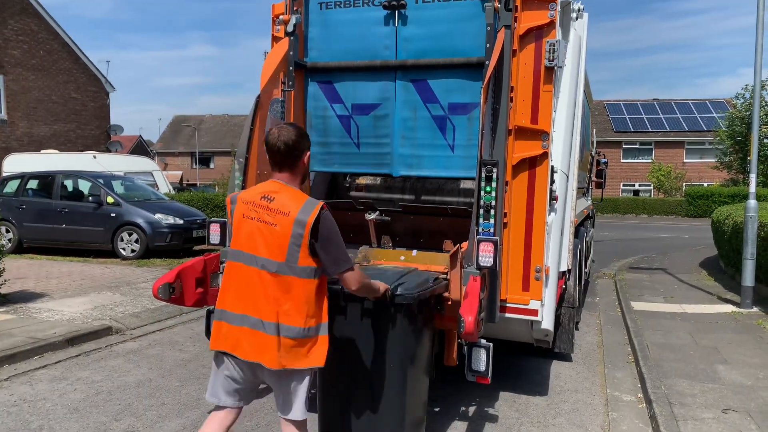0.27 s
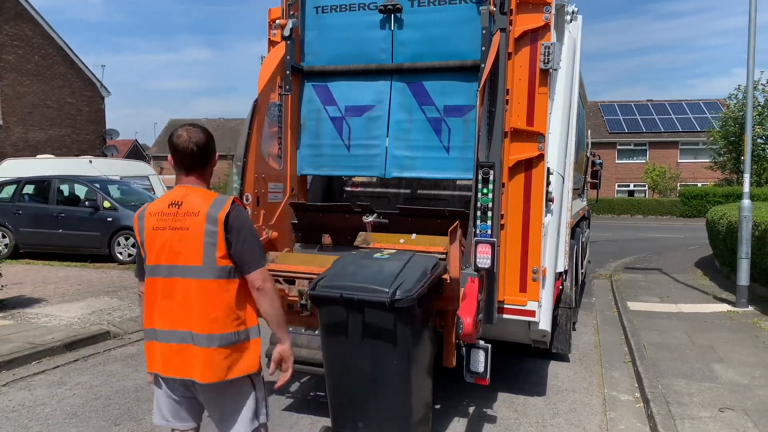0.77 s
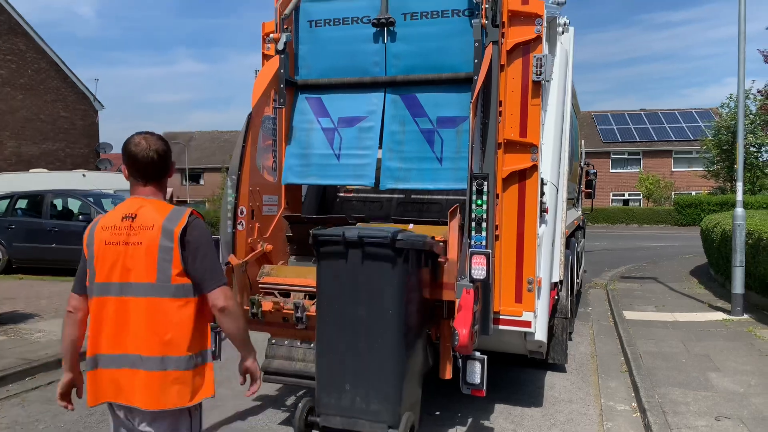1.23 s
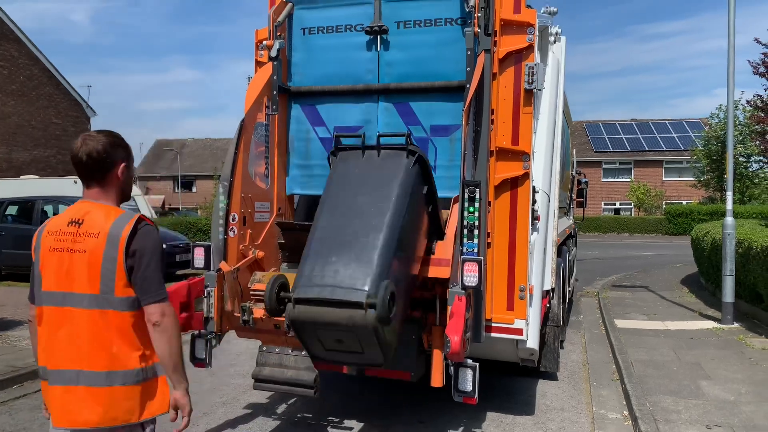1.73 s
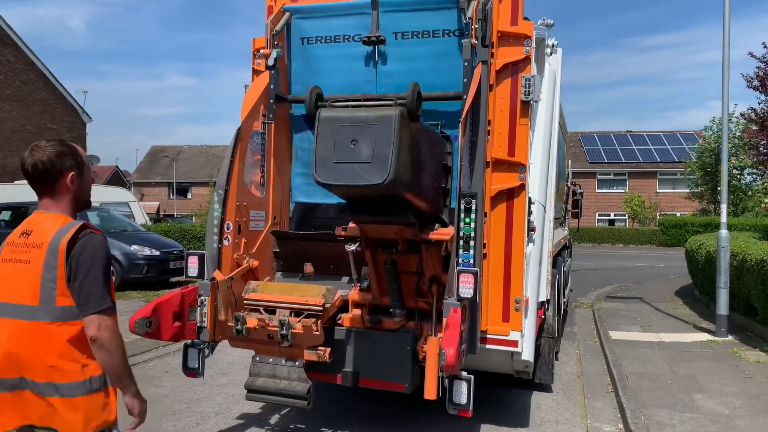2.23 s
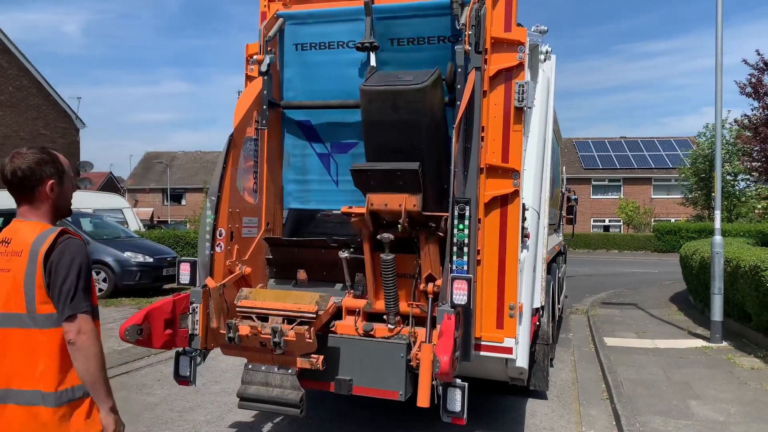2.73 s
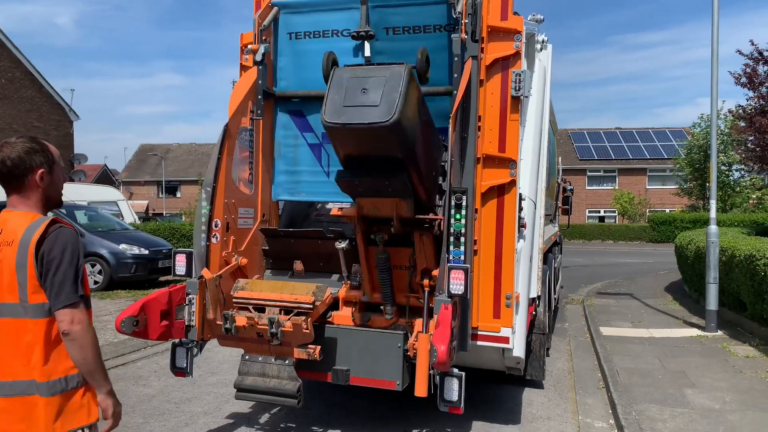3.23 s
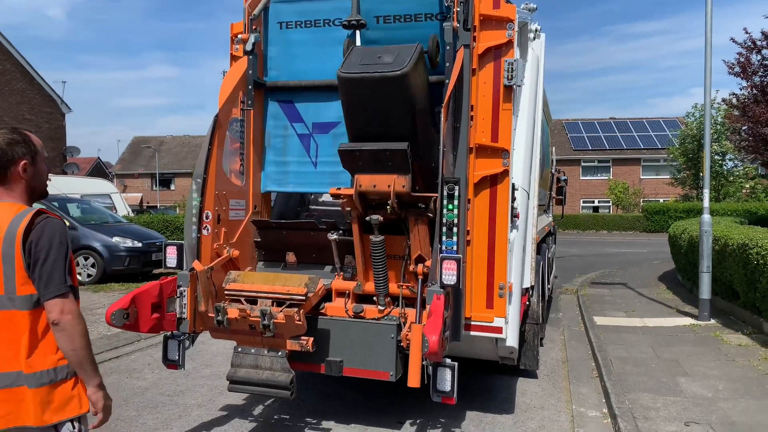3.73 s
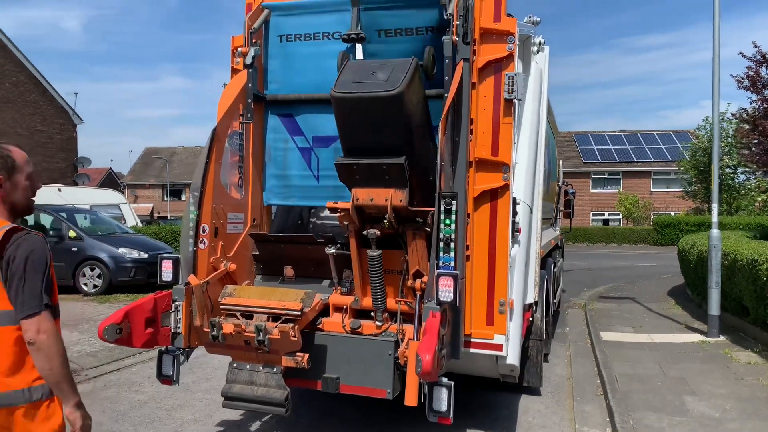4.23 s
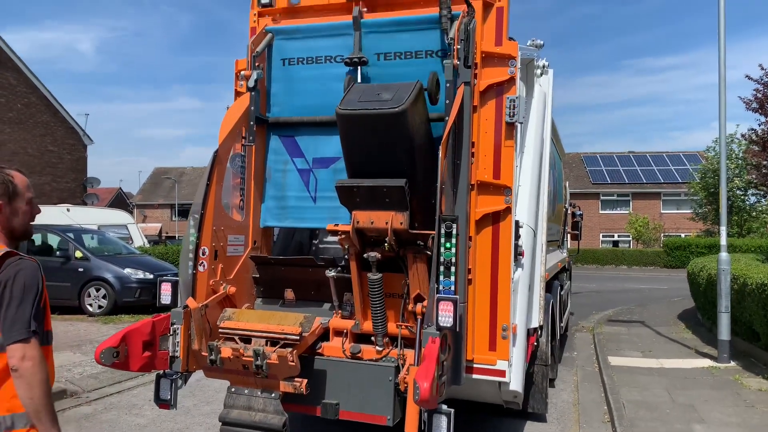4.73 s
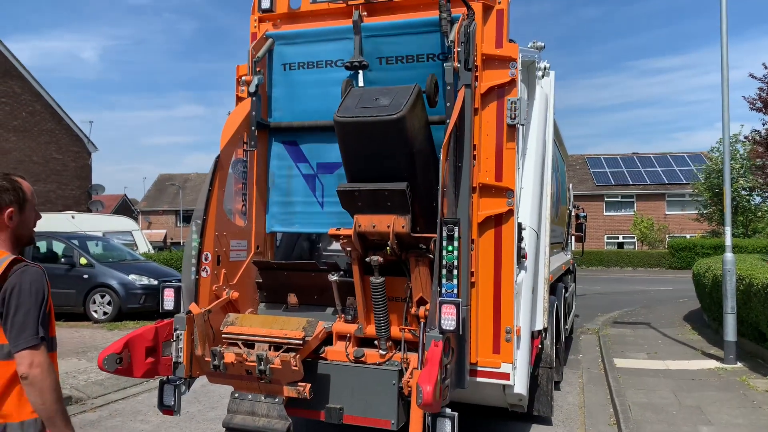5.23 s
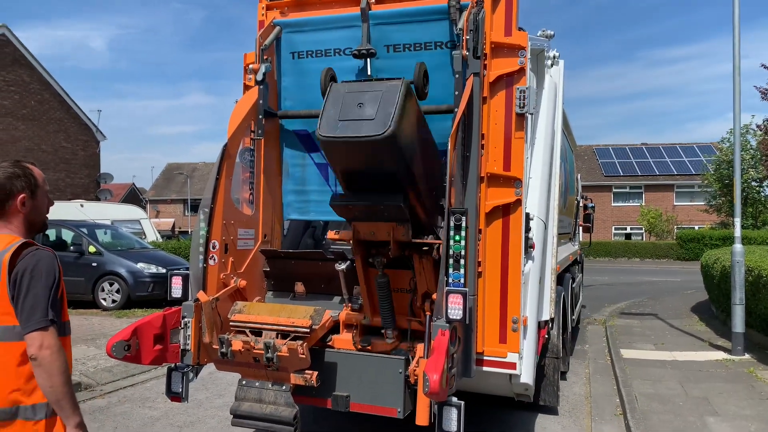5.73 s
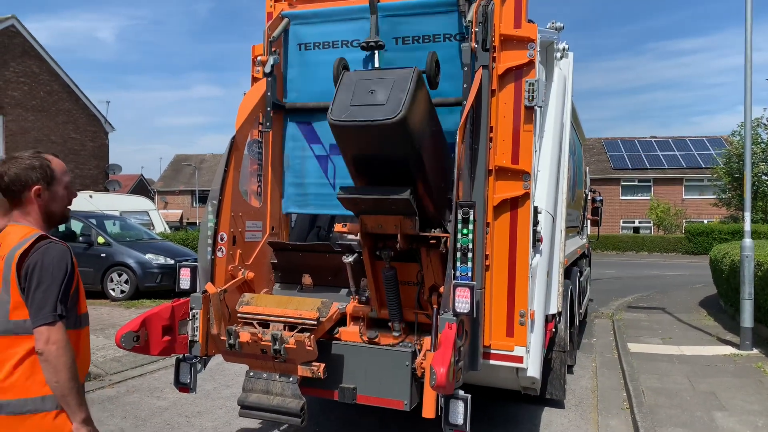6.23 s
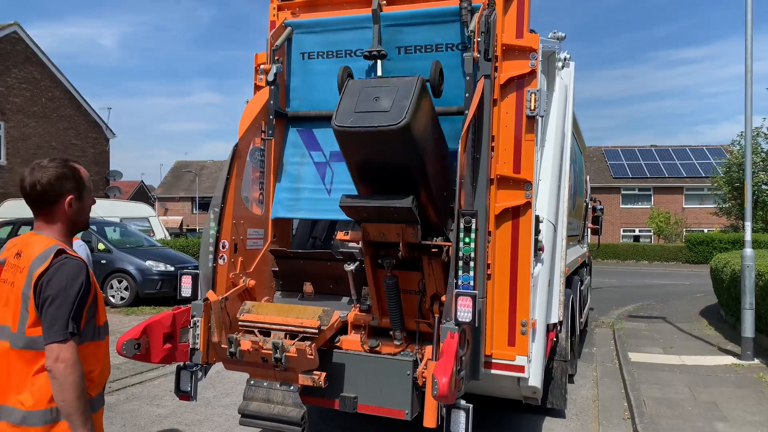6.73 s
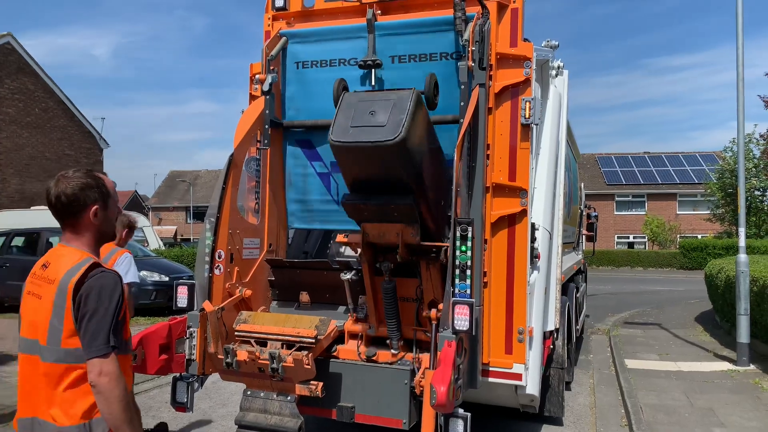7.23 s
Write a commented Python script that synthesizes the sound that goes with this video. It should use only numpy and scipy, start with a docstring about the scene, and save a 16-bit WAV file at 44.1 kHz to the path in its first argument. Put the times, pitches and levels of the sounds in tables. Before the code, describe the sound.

A refuse truck's hydraulic lift hisses as it bangs and shakes a plastic wheelie bin, recycling clattering over a diesel drone and wind.

```python
"""A street of houses: a refuse truck's rear lift hoists a wheelie bin, shakes the recycling into the
hopper and starts to bring it down. The plastic bin bangs on the steel frame, its contents clatter, the
arm groans and squeaks. Oil hisses and whistles through the lift valve; the diesel and its pump drone.
Gusts buffet the microphone, and the house fronts return a faint tail of the lift's noise."""
import sys
import numpy as np
from scipy import signal
from scipy.fft import rfft, irfft, next_fast_len
from scipy.io import wavfile
from scipy.ndimage import map_coordinates

SR = 44100
rng = np.random.default_rng(int(sys.argv[2]) if len(sys.argv) > 2 else 0)


def to_wav(s):
    """Save 16-bit WAV."""
    ch = np.atleast_2d(s).T  # columns
    pcm = np.round(np.clip(ch, -1, 1) * 32767)  # PCM
    wavfile.write(sys.argv[1], SR, pcm.astype(np.int16))


N = 330309

# bin against lift: start_s, level_db, boom_relative_db, boom_hz, rise_s
BLOWS = [(0.193, -12.5, -11, 400, .002), (0.263, -11.5, 8, 292, 0.00054), (0.322, -20, 14.5, 272, 0.0025),
         (0.446, -21, 12, 328, 0.0051), (0.634, -18, 4.5, 303, 0.0071), (0.763, -20, 12.5, 260, .0005),
         (1.352, -19.5, 7, 221, 0.0052), (1.393, -16.5, 1, 382, 0.0023), (1.438, -13, 10.5, 195, 0.0017),
         (1.465, -18, 8, 215, 0.0022), (2.373, -28, -8, 298, 0.0024), (2.628, -15, 10, 250, 0.013),
         (2.735, -24, 17.5, 218.7, 0.0044), (2.848, -8, -10, 398, 0.0055), (2.882, -15.5, 10, 249, 0.0077),
         (3.154, -9, 11, 274, 0.00056), (3.192, -6.5, -8, 329.5, 0.0054), (3.321, -10.5, 0, 449, .005),
         (3.355, -3.5, 2, 330, 0.0019), (3.386, -11.5, 13, 285, 0.0021), (3.412, -18, 18, 270, .004),
         (3.494, -10.5, -6, 452, 0.0028), (4.165, -17, 6, 330, 0.012), (5.576, -21, -5, 400, 0.0057),
         (5.734, -14, -2, 395.6, 0.0023), (5.755, -12.5, 3, 410, 0.0013), (5.782, -26.5, 16, 205, 0.0021),
         (5.883, -15, 6.5, 384, 0.0092), (5.94, -17, 2.5, 251, 0.0017), (6.108, -25, 12, 349.6, 0.00045),
         (6.561, -26.5, 12, 378.6, .002), (7.044, -28.5, 22, 300.6, 0.0064),
         (7.154, -16.5, -7, 353, 0.00092), (7.238, -25, -4, 349.5, 0.0029), (7.422, -12, 7, 300, 0.0055)]
# contact noise: freq_hz, density_db
CONTACT_SPECTRUM = [(200, 7), (450, 21), (800, 19), (1300, 10.5), (2200, 10), (3500, -14), (7000, 1.5),
                    (15000, -53)]
# contact decay: freq_hz, t60_s
CONTACT_DECAY = [(200, 0.21), (1000, 0.22), (3000, 0.15), (10000, 0.075)]
# steel comb and frame: pitch_hz, t60_s, level_db
FRAME_MODES = [(796, 0.27, 16), (830, 0.22, -4), (1068, 0.26, 6), (1196, 0.16, 7), (1374, 0.18, 11.5),
               (1680, 0.21, 8), (1925, 0.2, -16), (2330, 0.15, -1)]
# hollow bin: pitch_hz, t60_s, level_db
BIN_MODES = [(155, 0.11, -10), (191, 0.24, -1), (233, 0.14, 4), (273.7, 0.25, 3), (346.4, 0.086, 2.5),
             (412.4, 0.18, -2.5), (536, 0.19, -1), (682.7, 0.15, 4)]
# truck body: freq_hz, density_db
THUD_SPECTRUM = [(25, -25), (55, -1), (85, 10), (130, -20), (190, -6), (400, -8), (1500, -80)]


def bin_blows():
    """Each blow chatters at the contact, rings the frame, booms in the bin and shakes the truck."""
    out, t = np.zeros((2, N)), np.arange(SR // 4) / SR
    boom_rise_s, focus_octaves = .0028, .57
    thud_rise_s, thud_decay_s = .0034, .1
    for start_s, level_db, boom_db, boom_hz, rise_s in BLOWS:
        contact = noise(CONTACT_SPECTRUM, len(t)) * amp(wobble(273, len(t)))
        crash = decay(contact, CONTACT_DECAY) + .8 * contact * np.exp(-t / .004)
        clank = ring(FRAME_MODES, t, detune=.0511)
        # a blow favours the wall modes near boom_hz
        walls = [(hz, t60_s, db - 6 * (np.log2(hz / boom_hz) / focus_octaves) ** 2)
                 for hz, t60_s, db in BIN_MODES]
        boom = ring(walls, t, detune=.013) * rise(t, boom_rise_s)
        thud = noise(THUD_SPECTRUM, len(t)) * rise(t, thud_rise_s) * np.exp(-t / thud_decay_s)
        blow = amp(-10.5) * (crash + clank) + amp(boom_db - 2.5) * (boom + amp(-13.5) * thud)
        add(out, start_s, amp(level_db) * blow * rise(t, rise_s))
    return out


# stops and latches: start_s, level_db
CLICKS = [(0.2614, -26), (0.761, -28), (1.396, -16), (1.902, -22), (2.3705, -23), (2.8415, -18),
          (4.2257, -24), (5.732, -27)]
# steel on steel: freq_hz, density_db
STEEL_SPECTRUM = [(500, -22), (2000, 9.5), (4200, -3), (7000, 0), (15000, -2)]


def latches():
    """Steel stops and latches click: bright noise with a fast and a slow decay."""
    out, t = np.zeros((2, N)), np.arange(SR // 4) / SR
    envelope = fade(t, t60_s=.084) + amp(-4) * fade(t, t60_s=.19)
    for start_s, level_db in CLICKS:
        add(out, start_s, amp(level_db - 10.5) * noise(STEEL_SPECTRUM, len(t)) * envelope)
    return out


# bin lip, bottles and cans: start_s, level_db, pitch_hz, t60_s
KNOCKS = [(0.068, -21, 563, 0.12), (0.1935, -20, 835, 0.24), (0.196, -20.5, 1370, 0.12),
          (0.2635, -11, 943, 0.043), (2.592, -17, 770, 0.094), (2.686, -21, 785, 0.11),
          (2.874, -22, 785, 0.088), (3.158, -13, 730, 0.1), (3.364, -11, 705, 0.12),
          (3.395, -14, 808, 0.11), (3.524, -17.5, 643, .1), (5.734, -13, 783, .1), (5.757, -12, 705, 0.099),
          (5.944, -18, 1260, .05), (5.966, -19, 836, .08), (6.412, -23, 655, .08), (6.492, -13, 658, 0.077),
          (6.543, -15, 647, 0.065), (6.561, -13, 537, 0.064), (6.57, -12, 590, .05), (6.85, -22, 800, 0.11),
          (7.155, -21, 763, 0.091), (7.178, -20, 816, 0.11), (7.276, -24.5, 710, 0.11),
          (7.436, -20, 1180, 0.072)]
# small shell: pitch_ratio, t60_ratio, level_db
SHELL_MODES = [(1, 0.72, 1), (1.538, .85, -6.5), (1.96, 0.49, -18), (2.75, .5, -17)]


def knocks():
    """Single hard contacts ring small shells, each with its own pitch and decay."""
    out, t = np.zeros((2, N)), np.arange(SR // 4) / SR
    for start_s, level_db, pitch_hz, t60_s in KNOCKS:
        modes = [(pitch_hz * ratio, t60_s * share, db) for ratio, share, db in SHELL_MODES]
        shell = ring(modes, t, detune=.0165)
        add(out, start_s, amp(level_db - 1.5) * shell * rise(t, .00025))
    return out


# bin on a hard stop: start_s, level_db
CRACKS = [(0.2625, -18), (3.1522, -3), (5.7335, -20), (6.108, -23), (7.1545, -22)]
# crack: freq_hz, density_db
CRACK_SPECTRUM = [(500, -10), (1800, 2), (4000, -2), (8000, -1), (15000, 0)]


def cracks():
    """The bin hits a hard stop: about a millisecond of broadband noise."""
    out, t = np.zeros((2, N)), np.arange(SR // 8) / SR
    envelope = pulse(t, crest_s=.0005)
    for start_s, level_db in CRACKS:
        add(out, start_s, amp(level_db - 7) * noise(CRACK_SPECTRUM, len(t)) * envelope)
    return out


# linkage rattles: start_s, level_db
RATTLES = [(0.064, -15.5), (0.207, -28), (0.323, -19.5), (0.447, -20), (1.44, -27), (1.468, -33),
           (3.153, -12), (3.324, -33), (3.357, -17), (3.386, -22), (3.408, -25), (6.109, -22.5),
           (7.154, -26), (7.178, -20), (7.239, -20)]
# pins and links: freq_hz, density_db
LINK_SPECTRUM = [(600, -21), (1500, 5), (2300, 3.5), (4000, -5), (6500, -20), (15000, -30)]


def linkage():
    """Loose pins and links buzz unevenly and die away."""
    out, t = np.zeros((2, N)), np.arange(SR // 8) / SR
    for start_s, level_db in RATTLES:
        buzz = unit(noise(LINK_SPECTRUM, len(t)) * amp(2.5 * wobble(320, len(t))))
        add(out, start_s, amp(level_db - 13) * buzz * fade(t, t60_s=.17))
    return out


# load sliding in the bin or into the hopper: start_s, end_s, level_db
SLIDES = [(0.27, 0.623, -37), (1.35, 1.878, -39.5), (2.604, 2.723, -28), (2.857, 3.14, -27.5),
          (3.337, 3.538, -31.5), (5.527, 6.304, -34), (6.276, 6.585, -32), (6.862, 6.929, -31),
          (7.157, 7.488, -34.5)]


def load_motion():
    """Clatter envelope: the load slides as the bin tilts, and every blow jolts it."""
    jolt_db, settle_s = -14.5, .1
    power = sum((amp(level_db) * gate(start_s, end_s, rise_s=.0082, fall_s=.29)) ** 2
                for start_s, end_s, level_db in SLIDES)
    power *= amp(2.5 * wobble(30)) ** 2
    t = np.arange(SR) / SR
    for start_s, level_db, *_ in BLOWS:
        add(power, start_s, (amp(level_db + jolt_db) * np.exp(-t / settle_s)) ** 2)
    return np.sqrt(power)


# tumbling objects, also arm friction: freq_hz, density_db
CLATTER_SPECTRUM = [(120, -18), (280, 3), (500, 2), (900, -1.5), (1500, -6), (3000, -14), (6000, -18),
                    (15000, -31.5)]


def recycling():
    """Cartons and bottles tumble: random taps on a few objects, each with its own ring."""
    objects, taps_per_s = 10, 36
    out = np.zeros((2, N))
    for _ in range(objects):
        taps = (rng.random(N) < taps_per_s / SR) * rng.choice([-1, 1], N)
        taps = taps * amp(6.2 * np.minimum(rng.exponential(size=N), 2))
        response = decay(noise(CLATTER_SPECTRUM, SR // 5), CONTACT_DECAY)
        out += signal.fftconvolve(taps[None], response, axes=1)[:, :N]
    return load_motion() * unit(out)


# arm swinging the bin: time_s, level_db
GROAN_LEVEL = [(0, -20.5), (.17, -27), (.3, -33.5), (1.1, -42), (1.3, -36), (1.43, -16), (1.6, -28),
               (1.85, -26.5), (2.05, -46), (2.55, -34), (2.6, -25), (2.67, -25), (2.8, -27), (3.5, -49),
               (4, -48), (6.9, -36.5), (7.49, -28.5)]
# loaded arm: centre_hz, width_hz, level_db
ARM_RESONANCES = [(186, 31, 17.5), (432, 48, 1.5), (493.6, 15, 2), (2420, 600, -5)]


def arm_groan():
    """Bearing friction excites the arm; its resonances wander as the weight shifts."""
    speed = 1 + .06 * wobble(6)
    groan = varispeed(resonate(noise(CLATTER_SPECTRUM), ARM_RESONANCES), speed)
    return amp(curves(GROAN_LEVEL)[0]) * unit(groan)


# pivot: start_s, pitch_hz, length_s, level_db
SQUEAKS = [(3.005, 880, 0.041, -15), (5.067, 857, 0.044, -26.5), (5.09, 812, 0.14, -40)]


def pivot_squeaks():
    """The dry pivot sings briefly at an unsteady pitch."""
    out = np.zeros(N)
    for start_s, pitch_hz, length_s, level_db in SQUEAKS:
        swell = np.hanning(int(length_s * SR))
        phase = phase_of(pitch_hz * (1 + .035 * wobble(276, len(swell))))
        add(out, start_s, amp(level_db) * swell * (np.sin(phase) + amp(-16) * np.sin(2 * phase)))
    return out


# ram strokes (raise, two shakes, two returns): start_s, end_s, level_db, spool_start_s
STROKES = [(0, 2.58, -37.3, -.25), (2.85, 3.24, -36, 3.1), (3.31, 4.12, -36, 3.5),
           (6.24, 7.09, -35.5, 6.47), (7.37, 7.49, -35, 7.44)]
# oil past the spool while the lift holds or eases the bin: start_s, end_s, level_db
CREEPS = [(2.641, 2.85, -41), (5.036, 5.545, -51), (5.554, 6.242, -44), (7.166, 7.38, -41)]
# pressure surges as the arm rocks: crest_s, length_s, level_db
SURGES = [(2.777, 0.07, -39), (2.873, 0.11, -33), (2.978, 0.096, -32.5), (3.096, 0.13, -27),
          (3.193, 0.19, -30.5), (3.326, 0.083, -25.5), (3.41, 0.13, -27.5), (3.527, 0.28, -32.5),
          (6.36, 0.062, -30), (6.503, 0.12, -34.5), (7.255, 0.072, -32.5)]
# valve spurts: start_s, level_db
SPURTS = [(2.754, -25), (2.771, -27), (2.8447, -30), (5.07, -21.5), (5.547, -26), (5.5747, -23),
          (5.8835, -27), (5.9401, -22), (5.9649, -23), (6.0354, -28), (6.1048, -26), (6.157, -22),
          (6.24, -27)]
VALVE_OPEN_S, VALVE_CLOSE_S = .0018, .042  # time constants


def oil_flow():
    """Jet envelope: a leak, held strokes and creeps, rounded surges and sharp spurts."""
    leak_db = -56
    power = np.full(N, amp(leak_db) ** 2)
    for start_s, end_s, level_db, _ in STROKES:
        power += (amp(level_db + 1) * gate(start_s, end_s, VALVE_OPEN_S, VALVE_CLOSE_S)) ** 2
    for start_s, end_s, level_db in CREEPS:
        power += (amp(level_db) * gate(start_s, end_s, VALVE_OPEN_S, VALVE_CLOSE_S)) ** 2
    for crest_s, length_s, level_db in SURGES:
        add(power, crest_s - length_s / 2, amp(level_db) ** 2 * np.hanning(int(length_s * SR)))
    flow = np.sqrt(power) * amp(1.18 * wobble(60) + 1.06 * wobble(12))
    t = np.arange(SR // 5) / SR
    for start_s, level_db in SPURTS:
        add(flow, start_s, amp(level_db - 6.5) * rise(t, .003) * fade(t, t60_s=.073))
    return flow


# open-valve whistle, following the ram load: time_s, pitch_hz, level_db, width_ratio
WHISTLE = [(.1, 6550, -12, 2.2), (.24, 6880, -4.5, 1.42), (.85, 6750, -8.5, 1.5), (1.0, 6450, -20, 1.4),
           (1.18, 6400, -18, 2), (1.5, 6467, -9, 1.8), (1.62, 7030, -4.5, 1.63), (2.1, 6860, -4.5, 2.06),
           (2.3, 6730, -3.5, 1.8), (2.58, 7150, -5, 1.84), (3.1, 6190, -3.5, 1), (4.1, 6236, -1, 0.86),
           (6.3, 6190, -6.5, 0.98), (6.5, 6170, 0, 1.02), (6.97, 6150, -2, .7), (7.09, 6210, -2.5, .8),
           (7.49, 6190, 0, 0.86)]


def spool():
    """The spool slides open in each stroke and the whistle sinks. Returns its pitch and level."""
    narrow_hz, narrow_db, creep_db, slide_s = 10670, -6, -19, .17
    t = np.arange(N) / SR
    open_hz, open_db, _ = curves(WHISTLE)
    pitch_hz, level_db = np.zeros(N), np.zeros(N)
    last_shut_s = -np.inf
    for start_s, end_s, _, spool_start_s in STROKES:
        narrowness = np.exp(-np.maximum(t - spool_start_s, 0) / slide_s)
        stroke_hz = open_hz + (narrow_hz - open_hz) * narrowness
        stroke_db = np.where(t >= start_s, open_db + narrow_db * narrowness, creep_db)
        pitch_hz = np.where(t > last_shut_s, stroke_hz, pitch_hz)
        level_db = np.where(t > last_shut_s, stroke_db, level_db)
        last_shut_s = end_s + VALVE_CLOSE_S
    return pitch_hz, level_db


# oil jet: freq_hz, density_db
JET_SPECTRUM = [(1000, 4), (2500, -3.5), (5000, -2), (7500, -3), (10000, 3), (13000, 3.5), (15500, 2.5)]


def valve():
    """Oil jets through the valve: a broad hiss and a breathy whistle with its octave."""
    pitch_hz, whistle_db = spool()
    phase = phase_of(pitch_hz * (1 + .012 * wobble(30)))
    # a narrower gap or a heavier load gives a more ragged tone
    raggedness = curves(WHISTLE)[2] * (pitch_hz / pitch_hz.max()) ** 2
    tone = noise_band(phase, raggedness, base_width_hz=1100)
    octave = noise_band(2 * phase, raggedness, base_width_hz=2000)
    whistle = stereo(tone + amp(-7) * octave, JET_SPECTRUM) * amp(1.2 * wobble(25))
    return oil_flow() * (amp(3.5) * noise(JET_SPECTRUM) + amp(whistle_db + 6.5) * whistle)


# pump whine: time_s, pitch_hz, level_db
PUMP_WHINE = [(0, 340.7, -28), (.9, 338.1, -45.5), (1.2, 345, -35), (1.6, 346, -26.5), (1.95, 346, -29.5),
              (2.15, 345, -41), (2.5, 345.7, -34.5), (2.85, 331.5, -32.5), (3.05, 332.4, -22),
              (3.3, 338.4, -44), (4.8, 346.7, -39.5), (5.4, 338, -29), (6.9, 339.3, -40),
              (7.45, 335.7, -26)]
# exhaust tones: crank_order, level_db
EXHAUST_ORDERS = [(3, -64), (6, -60), (12, -48), (15, -60)]
# diesel clatter: freq_hz, density_db
DIESEL_SPECTRUM = [(25, -22), (55, -14), (100, 8.5), (200, -14), (300, -1.5), (450, -45), (620, -7.5),
                   (820, -13.5), (1000, -12), (1270, -14), (2100, -16.5), (3200, -19.5), (6000, -27.5),
                   (15500, -44)]
# covers and pipework: centre_hz, width_hz, level_db
COVER_RESONANCES = [(618, 84, -15), (793, 69, 5.5), (1250, 86, 6.5), (2055, 100, 0.5)]


def engine():
    """The crank drives the pump whine, the exhaust tones and a clatter that swells at each firing."""
    pump_order, firings_per_turn = 20, 3
    pump_hz, pump_db = curves(PUMP_WHINE)
    crank = phase_of(pump_hz * (1 + .00736 * wobble(25.41))) / pump_order
    ripple = 1 + .26 * wobble(70)
    whine = amp(pump_db + wobble(20)) * unit(ripple * np.sin(pump_order * crank + .4 * wobble(60)))
    exhaust = sum(amp(db + 5.5 * wobble(9)) * unit(np.sin(order * crank + rng.uniform(0, 2 * np.pi)))
                  for order, db in EXHAUST_ORDERS)
    firing = 1 + .17 * np.cos(firings_per_turn * crank)
    covers = unit(resonate(noise(DIESEL_SPECTRUM), COVER_RESONANCES)) * amp(-44.5 + 3.3 * wobble(11))
    return whine + exhaust + firing * (amp(-38.5) * noise(DIESEL_SPECTRUM) + covers)


# turbulence behind an eddy: freq_hz, density_db
WAKE_SPECTRUM = [(100, -10), (300, 11), (700, 1.5), (1100, -13), (2000, -31), (5000, -60)]


def eddy(level_db, pitch_hz, wake_db):
    """One quick pressure swing and a short turbulent wake."""
    t = np.arange(SR // 25) / SR
    swing = np.sin(2 * np.pi * pitch_hz * t) * pulse(t, crest_s=.5 / pitch_hz)
    wake = noise(WAKE_SPECTRUM, len(t)) * rise(t, .0005) * np.exp(-t / .005)
    return amp(level_db - 3.5) * swing + amp(level_db + wake_db) * wake


# strong eddies: start_s, level_db, pitch_hz, wake_relative_db
EDDIES = [(0.232, -4, 130, -5.5), (0.25, -3, 90, -15), (0.783, -7, 89, -20), (0.849, -5, 110, -24),
          (0.877, -8, 139, -16), (0.893, -8, 99, -15), (1.004, -15.5, 334, -17), (1.085, -13, 117, -26),
          (2.194, -12, 152.6, -28), (3.0, 1, 255, -10), (3.724, -8, 169.6, -7), (3.736, -3, 240, -11),
          (3.763, -7.5, 350, 0), (3.794, -7.5, 215, -7), (3.887, -12.5, 378, 1), (4.139, -7, 231, -11),
          (4.283, -7.5, 300, -15), (4.315, -10.5, 327.3, -8.5), (4.347, -6, 299, -2.5),
          (4.386, -7, 249, -13), (4.414, -6, 170, 2.5), (4.439, -11, 352, -2), (4.459, -5, 238, -3),
          (4.501, -9, 279.6, -9), (4.567, -17, 318, 1.5), (4.59, -8, 249, -18), (4.603, -19, 397, 3),
          (4.652, 0, 200, -9), (4.67, -8, 258, -18), (5.155, -15, 104, -31), (6.155, -13, 230.3, -27),
          (6.165, -4, 200, -18), (6.176, -13, 407, -4), (6.193, -8, 201, 0), (6.259, -6.5, 340, -1.5),
          (6.287, -5.5, 260.5, -4), (6.298, 1, 198, -16), (6.429, -7, 109.7, -12), (6.468, -10, 220, -1),
          (6.493, -17, 304, -1), (6.526, -14, 219, -9), (6.563, -7, 400, -2), (6.571, -8, 350, -4)]
# runs of lesser eddies: start_s, end_s, level_db
FLURRIES = [(0.8, 0.893, -22), (3.699, 3.84, -21), (4.351, 4.53, -17.5), (4.573, 4.68, -18.5),
            (6.154, 6.31, -20.5), (6.438, 6.564, -14)]


def wind_pops():
    """Eddies pop on the microphone, singly and in flurries."""
    eddies_per_s, typical_hz, spread_db = 70, 264, 8.5
    out = np.zeros((2, N))
    for start_s, level_db, pitch_hz, wake_db in EDDIES:
        add(out, start_s, eddy(level_db, pitch_hz, wake_db))
    for start_s, end_s, level_db in FLURRIES:
        for slot_s in np.arange(start_s, end_s, 1 / eddies_per_s):
            weakness, octaves = rng.uniform(-1.18, 1, 2)
            onset_s = slot_s + rng.random() / eddies_per_s
            polarity = rng.choice([-1, 1])
            pop = eddy(level_db - spread_db * weakness, typical_hz * 2 ** octaves, wake_db=-3.5)
            add(out, onset_s, polarity * pop)
    return out


# gust strength: time_s, level_db
GUSTS = [(0.0, -14.5), (0.08, -17.5), (0.18, -26.5), (0.25, -19), (0.55, -20.5), (0.9, -17), (0.94, -23.5),
         (1.11, -27), (1.17, -35), (1.33, -23.5), (1.46, -14), (1.56, -26), (1.88, -25.5), (2.54, -34),
         (2.65, -22.5), (3.11, -24), (3.19, -17), (3.6, -20.5), (3.72, -19.5), (4.01, -26), (4.51, -18.5),
         (4.92, -25.5), (5.01, -45), (5.17, -30), (5.3, -40.5), (5.61, -26.5), (5.67, -35), (5.8, -23),
         (6.12, -20), (6.44, -18.5), (6.66, -19.5), (7.01, -30), (7.2, -18.5), (7.24, -30.5), (7.49, -20)]
# buffeting: freq_hz, density_db
RUMBLE_SPECTRUM = [(20, -38), (35, -13), (55, -4), (75, 0), (105, -4), (150, -7.5), (230, -12),
                   (350, -22.5), (600, -38.5), (1500, -94), (4000, -85)]
# small eddies: freq_hz, density_db
FLUTTER_SPECTRUM = [(80, 4.5), (200, 2.5), (350, 6.5), (600, -7), (1000, -32), (2000, -17), (5000, -69)]


def wind_gusts():
    """Gusts rumble on the microphone; the flutter of small eddies grows faster than the rumble."""
    breeze_db, flutter_growth = -21.5, 1.17
    gust_db = curves(GUSTS)[0] + 2.5 * wobble(14)
    flutter_db = -30 + flutter_growth * (gust_db - breeze_db)
    rumble = unit(noise(RUMBLE_SPECTRUM) * amp(1.36 * wobble(35)))
    flutter = unit(noise(FLUTTER_SPECTRUM) * amp(5.3 * wobble(100)))
    return amp(gust_db + 2.5) * rumble + amp(flutter_db) * flutter


# street reverberation: freq_hz, t60_s
STREET_DECAY = [(150, 0.16), (1500, 0.28), (10000, 0.33)]


def street(x):
    """The hopper and house fronts return a short, delayed, diffuse tail."""
    tail = decay(rng.standard_normal((2, SR // 2)), STREET_DECAY)
    tail = np.pad(tail / np.linalg.norm(tail[0]), ((0, 0), (SR // 80, 0)))
    return signal.fftconvolve(x, tail, axes=1)[:, :N]


# left and right microphone ports: freq_hz, correlation
PORT_CORRELATION = [(60, .78), (300, .8), (640, .48), (1400, .45), (3100, .35), (5000, .1), (6700, .7),
                    (7500, .1), (8100, -.97), (8800, -.97), (9500, .2), (10300, .85), (11300, .85),
                    (12200, 0), (13000, -.97), (13900, -.97), (14500, 0), (15300, .8)]


def stereo(pair, spectrum):
    """Two independent signals to a coloured, partly correlated left and right, rms 1."""
    def response(hz):
        angle = np.arccos(np.clip(log_interp(PORT_CORRELATION, hz), -1, 1)) / 2
        return amp(log_interp(spectrum, hz)) * [np.cos(angle), np.sin(angle)]
    mid, side = filtered(pair, response)
    return unit(np.array([mid + side, mid - side]))


def noise(spectrum, size=N):
    """Coloured stereo noise, rms 1."""
    return stereo(rng.standard_normal((2, size)), spectrum)


def noise_band(phase, width_ratio, base_width_hz):
    """Two channels of narrow noise around a moving carrier."""
    lowpassed = filtered(rng.standard_normal((4, N)), lambda hz: 1 / (1 + (hz / base_width_hz) ** 2))
    in_phase, quadrature = varispeed(lowpassed, width_ratio).reshape(2, 2, N)
    return unit(in_phase * np.cos(phase) + quadrature * np.sin(phase))


def ring(modes, t, detune):
    """Struck modes, with random strength and detuning for each strike."""
    hz, t60_s, level_db = np.transpose(modes)[:, :, None]
    strength = amp(level_db + 4 * rng.standard_normal(hz.shape))
    pitch_hz = hz * (1 + detune * rng.standard_normal(hz.shape))
    phase = rng.uniform(0, 2 * np.pi, hz.shape)
    # higher modes reach the two ports further out of step
    phase = phase + rng.standard_normal((2, len(hz), 1)) * np.sqrt(hz / 1800)
    partials = strength * fade(t, t60_s) * np.sin(2 * np.pi * pitch_hz * t + phase)
    return partials.sum(1) / np.linalg.norm(strength)


def resonate(x, resonances):
    """Parallel band-pass resonators."""
    return filtered(x, lambda hz: sum(
        amp(db) * 1j * hz * width_hz / (centre_hz ** 2 - hz ** 2 + 1j * hz * width_hz)
        for centre_hz, width_hz, db in resonances))


def decay(x, t60_table):
    """Fade each frequency at its own rate."""
    hz, t, bins = signal.stft(x, SR, nperseg=256)
    faded = bins * fade(t, log_interp(t60_table, hz)[:, None])
    return signal.istft(faded, SR, nperseg=256)[1][..., :x.shape[-1]]


def filtered(x, response):
    """Apply a frequency response."""
    size = x.shape[-1]
    padded = next_fast_len(size + size // 8)
    return irfft(rfft(x, padded) * response(np.fft.rfftfreq(padded, 1 / SR)), padded)[..., :size]


def varispeed(channels, speed):
    """Read looped channels at a varying speed."""
    position = np.cumsum(speed) % N
    return np.array([np.interp(position, np.arange(N), channel) for channel in channels])


def wobble(rate_hz, size=N):
    """Smooth random curve through unit-variance knots."""
    knots = rng.standard_normal(int(size * rate_hz / SR) + 4)
    coarse = np.arange(0, size, SR // 2000)
    return np.interp(np.arange(size), coarse, map_coordinates(knots, [coarse * rate_hz / SR]))


def curves(rows):
    """One per-sample curve for each column after time_s."""
    time_s, *columns = np.transpose(rows)
    return [np.interp(np.arange(N) / SR, time_s, column) for column in columns]


def log_interp(points, hz):
    """Read (freq_hz, value) points on a log axis."""
    freq_hz, values = np.transpose(points)
    return np.interp(np.log(hz + 1), np.log(freq_hz + 1), values)


def gate(start_s, end_s, rise_s, fall_s):
    """Rise, hold, exponential release."""
    t = np.arange(N) / SR
    return rise(np.maximum(t - start_s, 0), rise_s) * np.exp(-np.clip((t - end_s) / fall_s, 0, 20))


def rise(t, rise_s):
    return 1 - np.exp(-t / rise_s)


def fade(t, t60_s):
    return amp(-60 * t / t60_s)


def pulse(t, crest_s):
    return t / crest_s * np.exp(1 - t / crest_s)


def phase_of(hz):
    return 2 * np.pi * np.cumsum(hz) / SR


def amp(db):
    return 10 ** (np.asarray(db) / 20)


def unit(x):
    """Scale to rms 1."""
    return x / np.sqrt(np.mean(np.abs(x) ** 2) + 1e-20)


def add(track, start_s, sound):
    """Mix in place."""
    part = track[..., max(round(start_s * SR), 0):][..., :sound.shape[-1]]
    part += sound[..., :part.shape[-1]]


def scene():
    """The lift and its street tail, then valve, engine and wind."""
    impacts = bin_blows() + latches() + knocks() + cracks() + linkage()
    lift = (impacts + recycling() + arm_groan() + pivot_squeaks()) * amp([[.7], [-.7]])  # slightly left
    return lift + amp(-35.5) * street(lift) + valve() + engine() + wind_gusts() + wind_pops()


def record(dry):
    """Soft peak limiting, then a brick-wall low-pass."""
    ceiling, cutoff_hz = .92, 15900
    rounded = dry / (1 + np.abs(dry / ceiling) ** 6) ** (1 / 6)
    return filtered(rounded, lambda hz: hz < cutoff_hz)


dry = scene()
out = record(dry)
to_wav(out)
```